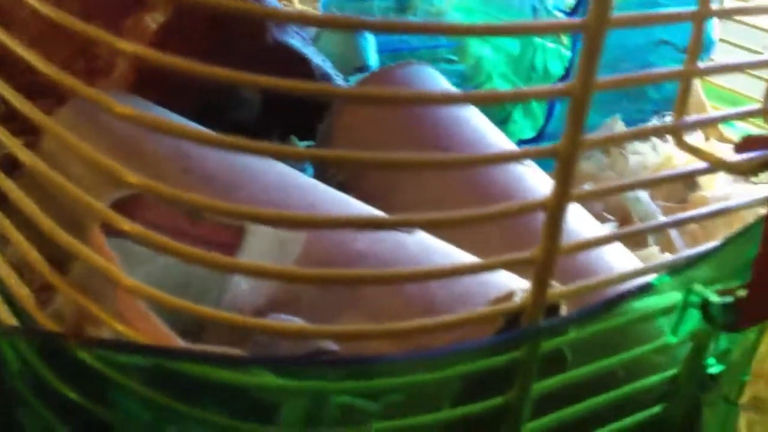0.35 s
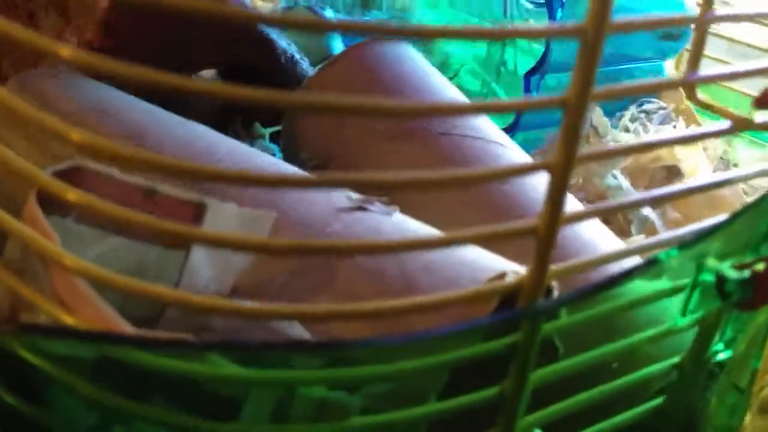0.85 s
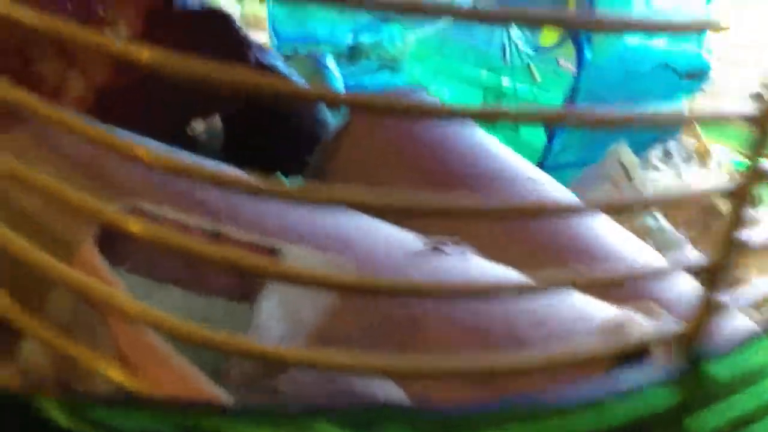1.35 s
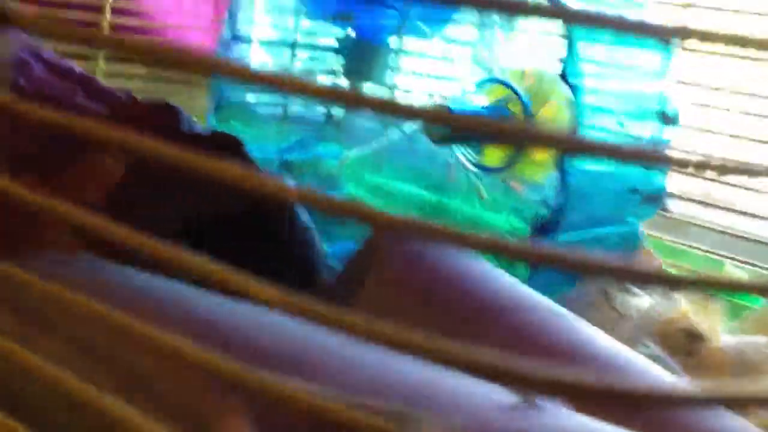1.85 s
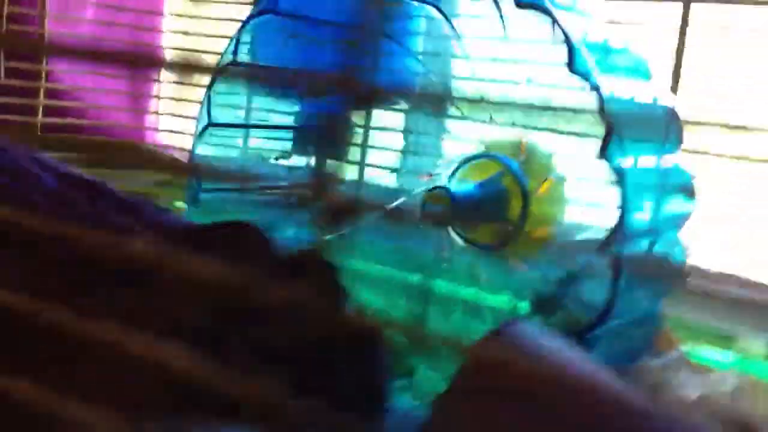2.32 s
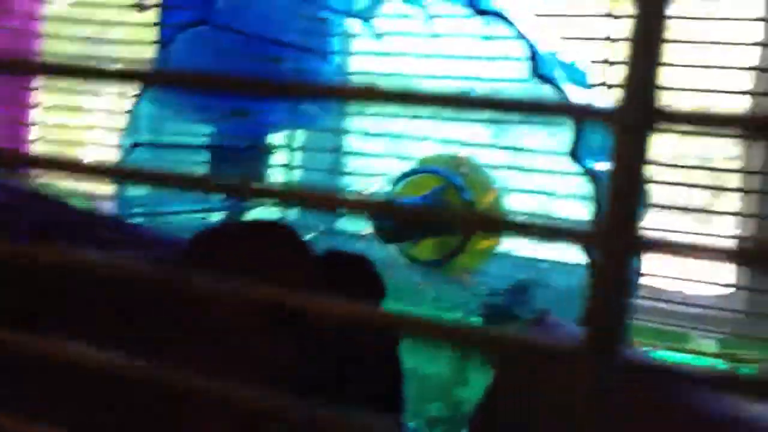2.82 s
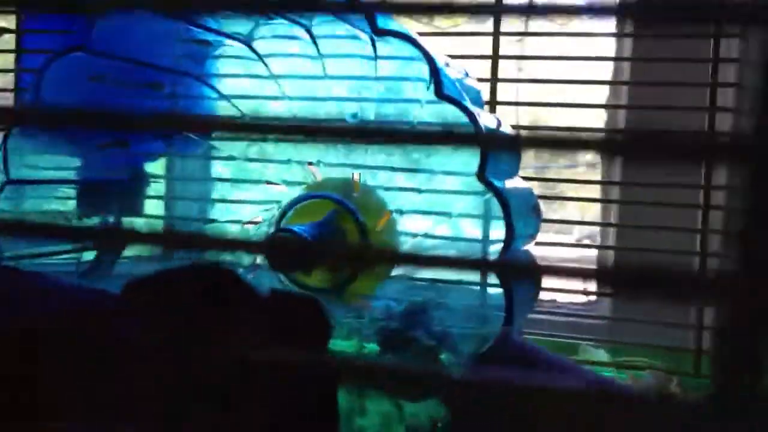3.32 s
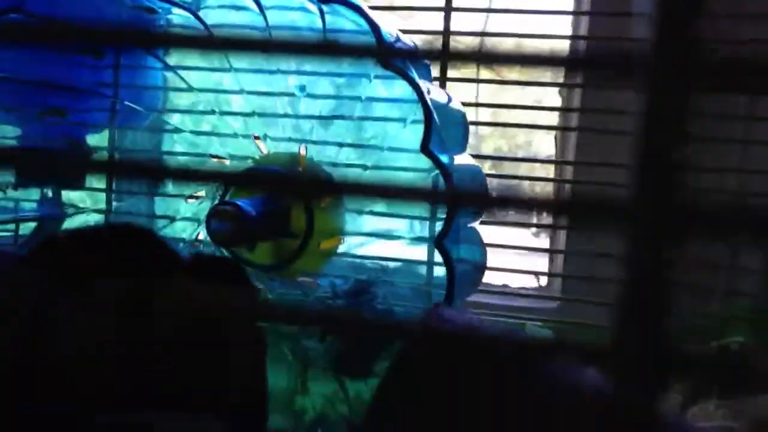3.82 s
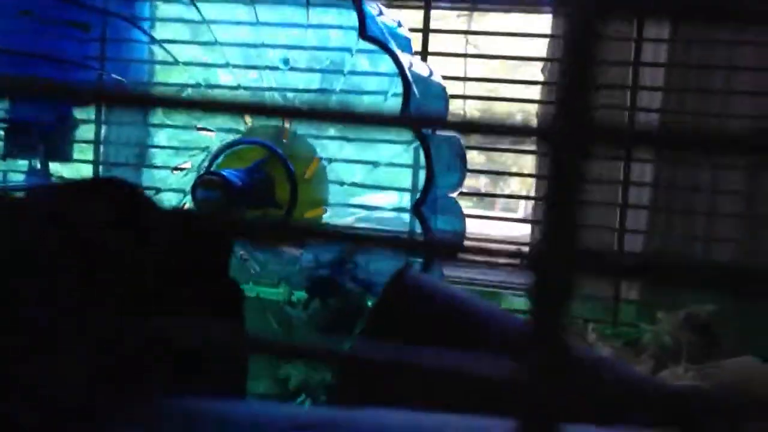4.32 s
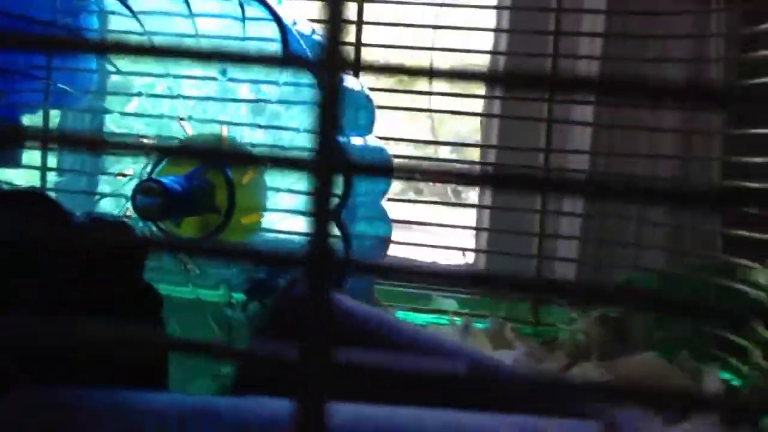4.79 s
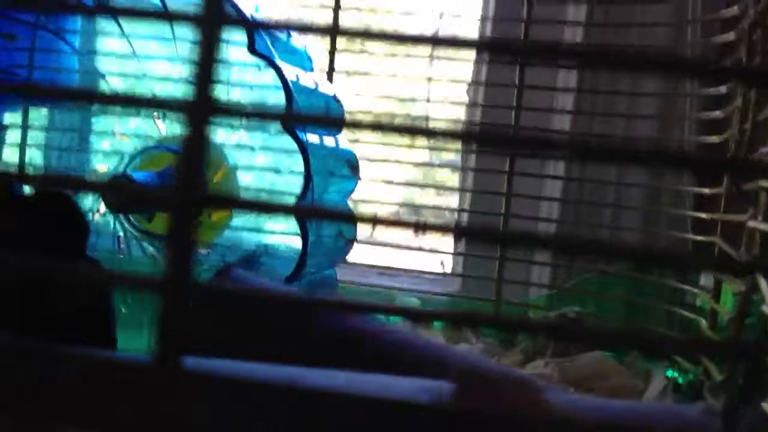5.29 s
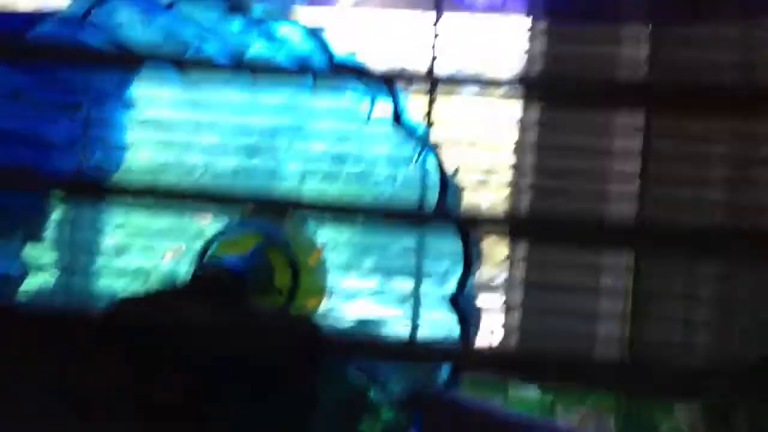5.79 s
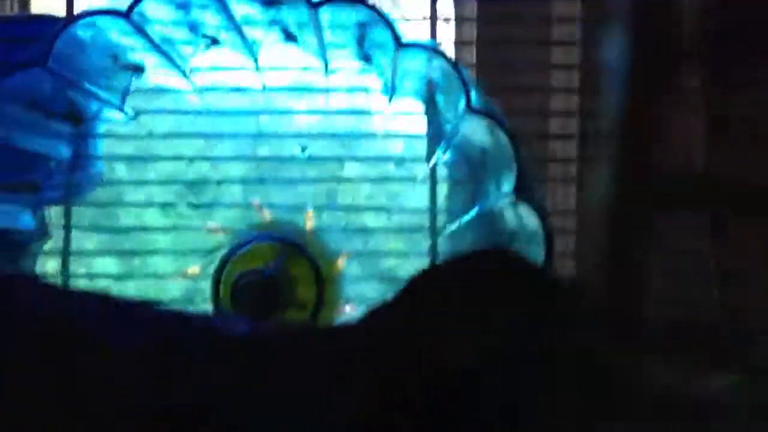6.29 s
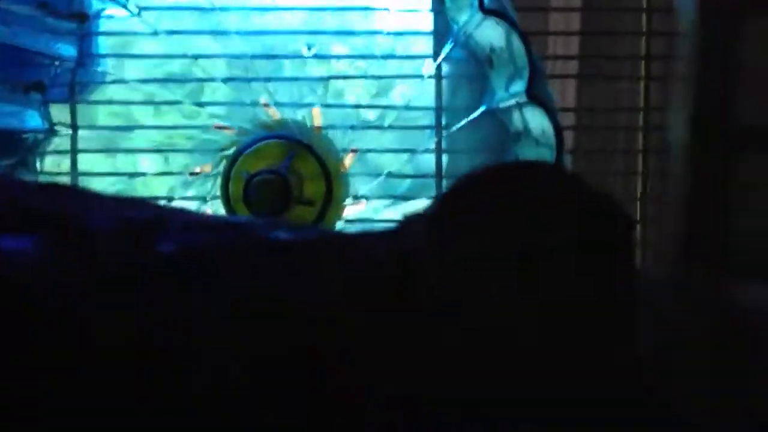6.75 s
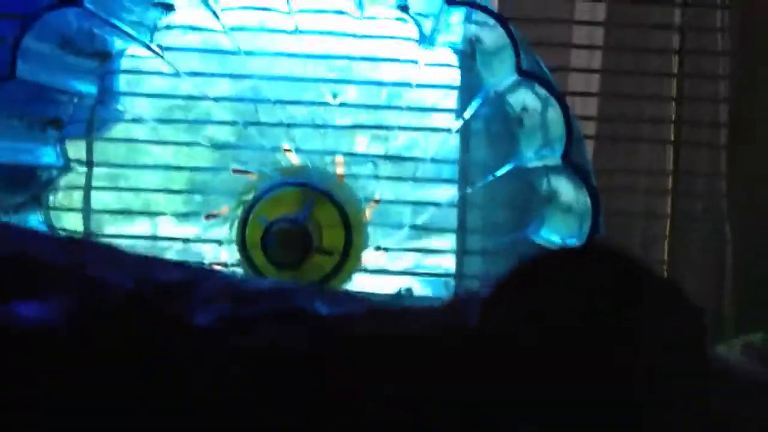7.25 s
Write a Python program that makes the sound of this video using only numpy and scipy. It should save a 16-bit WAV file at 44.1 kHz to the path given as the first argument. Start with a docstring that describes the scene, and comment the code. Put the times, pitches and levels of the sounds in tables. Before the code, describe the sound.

In a quiet room with faint hiss, a small wire and plastic cage is heard very close. Sparse dry ticks and soft brushing strokes thicken into busy crackling and plastic taps. Two sharp knocks follow, about a second apart, each with a short panel tone, dense rattle and beating metallic ring. Then it calms to a few faint ticks. A very faint distant whistle rises near the start and end.

```python
"""A quiet room, with a small animal cage of wire bars on a plastic base close by.
Bedding and fingers rustle and tick: shaped noise in tiny puffs and short crunches. Something soft brushes
past four times, as swelling hiss. Two knocks set off short panel tones and a dense noise rattle, and the
bars ring on as close, beating tones. Far away a faint whistle, a sliding tone, rises twice."""
import sys
import numpy as np
from scipy import signal
from scipy.io import wavfile
from scipy.ndimage import uniform_filter1d

SR = 44100
rng = np.random.default_rng(int(sys.argv[2]) if len(sys.argv) > 2 else 0)


def dump(signal):
    """Clip the signal to [-1, 1] and save it as 16-bit WAV at the path in sys.argv[1]."""
    limited = np.clip(np.atleast_2d(signal).T, -1, 1)
    pcm = np.round(limited * 32767).astype(np.int16)
    wavfile.write(sys.argv[1], SR, pcm)


def level_to_linear(level):
    """Convert decibel levels to linear amplitude factors, elementwise."""
    exponent = np.asarray(level, float) / 20
    return 10 ** exponent


N = 325325  # length of the scene in samples

# colour of dry crackle, ticks and fine hiss: (f/Hz, relative level per Hz/dB)
CRACKLE_COLOUR = [(350, -26.5), (600, -6), (954, -2.5), (1560, -10.5), (2220, -5.5), (3170, -8), (3780, -2),
                  (4510, -8), (5540, -2), (6400, -3.5), (8400, 1), (9700, -10), (11500, -7.5), (13000, -4),
                  (15200, -3), (15600, -26.5), (16000, -39)]
# colour of the plastic base when pushed: (f/Hz, relative level per Hz/dB)
SCUFF_COLOUR = [(29, -32.5), (50, -35), (190, 1), (366, -1.5), (602, -5.5), (800, -5.5), (923, -6.5),
                (1550, -15.5), (2200, -21.5), (3500, -27.5), (4550, -54.5), (7700, -120)]


def evened(x):
    """Scales a sound to an rms of 1."""
    return x / np.sqrt(np.mean(x ** 2) + 1e-20)


def read(points, hz):
    """Value of a table at hz, with straight lines between points on a log frequency axis."""
    f, value = np.transpose(points)
    return np.interp(np.log(hz + 1), np.log(f + 1), value)


def add(mix, s, sound):
    """Adds a sound to the mix, starting at s seconds."""
    part = mix[round(s * SR):][:len(sound)]
    part += sound[:len(part)]


def colour(x, points):
    """Minimum-phase filter with the given spectrum and energy 1: it acts as early as it can."""
    hz = abs(np.fft.fftfreq(8192, 1 / SR))
    log_gain = np.log(level_to_linear(np.maximum(read(points, hz), -100)))
    taps = np.fft.ifft(np.exp(np.conj(signal.hilbert(log_gain)))).real[:4096]
    return signal.oaconvolve(x, taps / np.linalg.norm(taps))[:len(x)]


def band(x, lo_hz, hi_hz):
    """Band-pass: keeps the part of a sound between two frequencies."""
    return signal.sosfilt(signal.butter(2, [lo_hz, hi_hz], "band", fs=SR, output="sos"), x)


def wander(smooth_s):
    """Slow random drift with an rms of 1: noise averaged twice over smooth_s."""
    size = round(smooth_s * SR)
    return evened(uniform_filter1d(uniform_filter1d(rng.standard_normal(N), size), size))


def knock(which):
    """Every blow rings the panel, shakes loose parts into a dense rattle and cracks in the treble."""
    # blows and rebounds, one list a knock: (t/s, body level/dB, treble level/dB)
    blows = [(4.184, -13, -30.5), (4.187, -6, -8.5), (4.194, -19, -12), (4.201, -22.5, -19.5),
             (4.220, -41.5, -25)], [(5.227, -16, -22.5), (5.233, -8.5, -13), (5.239, -18, -10),
             (5.258, -23, -30.5), (5.267, -31.5, -24), (5.288, -40, -26.5), (5.311, -32.5, -28),
             (5.345, -30, -49.5)]
    # panel tones, one list a knock: (f/Hz, width/Hz, relative level/dB); wide ones die sooner
    panels = [(277.2, 32, -10), (368, 25, 0), (622, 9.5, -2.5), (756, 120, -6), (1045, 15, -13.5),
              (1213, 10, -4.5), (1410, 130, -14.5), (1720, 95, -18), (1970, 31, -18.5), (2200, 200, -11),
              (2640, 69, -20), (2800, 24, -16.5)], [(186, 13, -14.5), (394, 48, 1.5), (853, 45, 0.5),
              (1230, 100, -13), (1365, 29, 3.5), (1660, 18, -13), (1965, 51, -1), (2020, 160, -5),
              (2525, 15, 2), (2975, 49, 0.5), (3134, 77, -5)]
    # colour of rattle and crack, one list a knock: (f/Hz, relative level per Hz/dB)
    clatter = [(47, -58), (80, -28.5), (136, -12.5), (309, -11), (386, 1.5), (527, -11), (802, -4.5),
               (1860, -19.5), (2380, -15), (5280, -23.5), (8410, -18.5), (10000, -28.5), (12500, -18.5),
               (15000, -27.5), (16000, -45)], [(47, -48), (80, -20.5), (174, -0.5), (253, -12.5), (395, 0),
               (431, -5), (734, -1.5), (1340, -9), (1460, 2), (1630, -5), (4520, -18), (8410, -17.5),
               (9400, -27), (14600, -23), (16000, -44.5)]
    # time the rattle takes to fall by 60 dB: (f/Hz, time/s)
    fade = [(100, .22), (500, 0.21), (1500, 0.23), (4000, .26), (8000, 0.21), (15000, 0.17)]
    # how hard each knock sets each family of bars ringing, one list a knock: (level/dB)
    bars_db = [-34.5, -51, -46, -44.5, -32.5, -54, -49.5, -52, -51, -48, -61.5, -57.5, -47, -47, -48], [-52,
               -54.5, -53, -54, -53, -60.5, -56.5, -52.5, -57.5, -47.5, -62.5, -57.5, -61, -64.5, -58.5]
    # share of the bars' ringing time left after each knock
    held = [.65, 1]
    out, t = np.zeros(N), np.arange(SR // 2) / SR
    modes = np.zeros(len(t))
    for hz, width, db in panels[which]:
        modes += level_to_linear(db) * width * np.exp(-.8 * np.pi * width * t) * np.sin(2 * np.pi * hz * t)
    modes *= (1 - np.exp(-t / 0.00033)) / abs(modes).max()
    for s, body_db, treble_db in blows[which]:
        # noise in which every frequency dies at its own rate
        hz, frame_s, z = signal.stft(rng.standard_normal(len(t)), SR, nperseg=128)
        z = z * level_to_linear(-60 * frame_s / read(fade, hz)[:, None])
        fading = signal.istft(z, SR, nperseg=128)[1][:len(t)]
        rattle = colour(fading * (1 - np.exp(-t / 0.0012)), clatter[which])
        burst = rng.standard_normal(len(t)) * level_to_linear(-60 * t / .04) * (1 - np.exp(-t / 0.00021))
        crack = colour(burst, clatter[which])
        body = level_to_linear(2.0) * modes + level_to_linear(-10.0) * band(rattle, 130., 4000.)
        treble = level_to_linear(4.0) * band(crack, 3700.0, 22000.0) + level_to_linear(-9.5) * band(rattle, 4000., 15500.)
        add(out, s, level_to_linear(body_db) * body + level_to_linear(treble_db) * treble)
    first_blow_s = blows[which][0][0]
    add(out, first_blow_s, bars(bars_db[which], held[which]))
    return out


def bars(levels_db, held, count=3):
    """Each family is a few nearly alike wires: close tones that beat as they die."""
    # families of wire bars: (f/Hz, time to fall by 60 dB when the share held is 1/s)
    families = [(435, 1.1), (505, 3.0), (565, 2.6), (605, 4.0), (850, .6), (1390, 2.2), (1480, 1.2),
                (1565, 2.2), (1620, 1.8), (1770, 1.0), (2750, .9), (3400, .8), (4300, .8), (4850, .8),
                (5750, .7)]
    t = np.arange(3 * SR) / SR
    sound = np.zeros(len(t))
    for (hz, t60), db in zip(families, levels_db):
        detune = 1 + .013 * (np.linspace(-1, 1, count) + .3 * rng.standard_normal(count))
        phase = 2 * np.pi * rng.random((count, 1))
        wires = np.sin(2 * np.pi * hz * np.outer(detune, t) + phase).sum(0)
        sound += level_to_linear(db - 60 * t / (held * t60)) * wires
    return sound / np.sqrt(count) * (1 - np.exp(-t / 0.019))


def ticks():
    """A short crunch that stops abruptly and leaves a weak tail; the struck bit rings, the base thuds on."""
    # bright snaps of dry bedding and wire: (t/s, treble level/dB, middle level/dB, f of struck bit/Hz,
    # length/ms)
    snaps = [(0.2463, -58.5, -63.5, 7800, 4.2), (0.6013, -61.5, -81, 8450, 2.7),
             (0.646, -62, -69, 7860, 20), (1.247, -62.5, -70, 7900, 4.4), (1.3483, -53.5, -63, 13200, 5.5),
             (2.0443, -56, -61.5, 12500, 24), (2.13, -62, -74, 14500, 14), (2.5889, -62, -76, 12000, 4.3),
             (2.645, -60, -65, 7900, 17), (2.6922, -54.5, -60.5, 13100, 13),
             (2.735, -50.5, -71, 12500, 5.7), (2.749, -59, -65, 14400, 5.5), (2.762, -57, -72, 14500, 6.8),
             (2.82, -53.5, -65, 13500, 1.9), (2.8927, -62, -75, 14780, 2.9),
             (2.9108, -59.5, -75, 14620, 2.6), (3.2588, -53.5, -60, 14790, 7.0),
             (3.2794, -56, -56, 5470, 6), (3.299, -41.5, -49.5, 12900, 7.3),
             (3.3083, -43.5, -58, 7690, 9.6), (3.3359, -44.5, -46.5, 6970, 4.7),
             (3.344, -42, -60, 8400, 2.7), (3.36, -56, -59, 5500, 32), (3.391, -41, -50.5, 7660, 9.7),
             (3.398, -42, -65, 8200, 7.2), (3.4267, -47, -64, 8320, 5.6), (3.4466, -36, -45.5, 13400, 10),
             (3.4795, -41.5, -47, 5330, 5.2), (3.5092, -35, -78, 13300, 6.4),
             (3.5142, -46.5, -45, 12940, 2.2), (3.524, -44.5, -68, 12970, 8.5),
             (3.539, -41, -44, 5600, 7.6), (3.7007, -53, -57.5, 13200, 7.9),
             (3.7457, -55, -61.5, 7750, 30.0), (3.817, -50.5, -57, 8260, 2.3), (3.9176, -55, -63, 5530, 26),
             (3.9823, -52, -61, 5400, 24), (4.0467, -52, -69.5, 7950, 8.9), (4.165, -50.5, -77, 7870, 5),
             (4.379, -60, -71, 7900, 4), (4.394, -61, -66, 7860, 4.2), (4.5098, -51, -59, 7800, 3.4),
             (4.6, -56.5, -74, 5700, 8.7), (4.62, -50, -53, 5800, 2.3), (4.66, -56, -64, 5650, 21),
             (4.741, -59, -68, 12800, 2.5), (4.8035, -51, -51, 8900, 11), (5.0062, -56, -66.5, 7700, 5),
             (5.128, -59, -67, 7800, 11), (6.0676, -51.5, -48, 3580, 15.5),
             (6.5156, -61.5, -60.5, 4500, 9.7), (7.0254, -64, -63.5, 4490, 11.5)]
    # taps on the plastic base: (t/s, treble level/dB, middle level/dB, thud level/dB, length/ms)
    taps = [(0.4892, -52, -56.5, -60.5, 2), (1.0137, -66, -68, -72, 41), (1.9878, -59.5, -55.5, -67, 0.8),
            (2.0695, -45.5, -42.5, -60, 1.66), (2.4053, -58.5, -53.5, -50.5, 2.1),
            (2.7719, -57, -51, -75, 2.1), (3.0151, -53, -52, -66, 1.6), (3.1658, -54, -57, -68, 2.7),
            (3.554, -56.5, -47.5, -62, 5.7), (3.561, -55, -67, -48.5, 8), (3.5905, -43, -45.5, -48, 9.2),
            (3.6075, -44.5, -45, -46, 2.7), (3.8846, -41.5, -45, -44.5, 4.3),
            (4.3522, -58.5, -41, -64, 2.1), (4.479, -58, -61.5, -71, 8.6), (4.557, -63.5, -57.5, -47, 28),
            (4.5986, -57, -48.5, -49.5, 11), (4.6605, -57.5, -49.5, -46.5, 10),
            (4.7161, -61, -63, -69, 7.6), (4.8226, -51, -42.5, -43.5, 15.5),
            (5.0306, -61.5, -72, -55, 11.5), (5.739, -69.5, -67.5, -78, 9.1), (5.768, -69, -65.5, -76, 15),
            (5.8085, -61.5, -64.5, -62.5, 12.4)]
    snap_thud_db = -22.5  # thud of the base under a snap, against its treble
    snap_thud_s, tap_thud_s = 0.007, 0.0096  # fading times of the thuds
    reach, edge_hz = 2.3, 16000.  # a snap's treble ends at this multiple of its pitch, at most at edge_hz
    tap_hz, tap_top_hz = 2230, 12000.  # pitch of the tapped plastic, end of its treble
    width = .25  # width of the ringing, as a share of its pitch
    ring_db, ring_db_per_octave = -7.5, 10.0  # ringing level, and its rise above 8000 Hz
    tail_db, tail_s = -7.5, 0.0066  # weak tail of the crunch
    linger_db, linger_s = -8.5, 0.014  # plastic ringing on in the middle
    t, out = np.arange(round(.2 * SR)) / SR, np.zeros(N)
    rows = []
    for s, high_db, mid_db, hz, ms in snaps:
        top_hz = min(reach * hz, edge_hz)
        rows.append((s, high_db, mid_db, high_db + snap_thud_db, hz, ms, top_hz, snap_thud_s))
    for s, high_db, mid_db, thud_db, ms in taps:
        rows.append((s, high_db, mid_db, thud_db, tap_hz, ms, tap_top_hz, tap_thud_s))
    for s, high_db, mid_db, thud_db, hz, ms, top_hz, thud_s in rows:
        crunch_noise, thud_noise, linger_noise = rng.standard_normal((3, len(t)))
        u = t / (ms / 1000)  # time as a share of the tick's length
        crunch = (1 - np.exp(-u / .15)) * np.exp(-u ** 2)
        tail = level_to_linear(tail_db) * (1 - np.exp(-u)) * np.exp(-t / tail_s)
        puff = crunch_noise * (crunch + tail)
        ringing = signal.lfilter(*signal.iirpeak(hz, 1 / width, SR), puff)
        ringing *= np.linalg.norm(puff) / np.linalg.norm(ringing)
        ring_gain = level_to_linear(ring_db + ring_db_per_octave * max(np.log2(hz / 8000), 0))
        snap = colour(puff, CRACKLE_COLOUR) + ring_gain * ringing
        high, middle = band(snap, 4500., top_hz), band(snap, 1000., 4500.)
        burst = u < 1  # the levels hold for this part
        high, middle = high / high[burst].std(), middle / middle[burst].std()
        linger = band(linger_noise, 630.0, 4000.) * (1 - np.exp(-u)) * np.exp(-t / linger_s)
        middle += level_to_linear(linger_db) * linger
        thud_shape = (1 - np.exp(-t / .002)) * np.exp(-np.maximum(t - ms / 1000, 0) / thud_s)
        thud = colour(thud_noise * thud_shape, SCUFF_COLOUR)
        add(out, s, level_to_linear(high_db) * high + level_to_linear(mid_db) * middle + level_to_linear(thud_db) * thud)
    return out


def tray(x, ring_db=-14.5, echo_db=-13.0, echo_t60_s=0.17):
    """The base answers every tick with its own short tones and a brief diffuse echo."""
    # tones of the plastic base: (f/Hz, relative level/dB, time to fall by 60 dB/s)
    tones = [(200, -3, 0.047), (347, -35.5, 0.25), (446, -10, 0.21), (756, -1, 0.2), (932, -1.5, 0.22),
             (1270, -5, 0.11), (1440, -2, 0.29), (1950, -1.5, 0.1), (2430, -10.5, 0.057),
             (2670, -11.5, .06), (3600, -6.5, 0.13), (4200, -8, 0.06), (6040, -4.5, 0.093)]
    t = np.arange(round(.3 * SR)) / SR
    modes = sum(level_to_linear(db - 60 * t / t60) * np.sin(2 * np.pi * hz * t) for hz, db, t60 in tones)
    echo = band(rng.standard_normal(len(t)), 160.0, 6500.0)
    echo *= level_to_linear(-60 * t / echo_t60_s) * (1 - np.exp(-t / 0.0021))
    answer = level_to_linear(ring_db) * modes / np.linalg.norm(modes) + level_to_linear(echo_db) * echo / np.linalg.norm(echo)
    return x + signal.oaconvolve(x, answer)[:N]


def brushes(width_hz=1600.0):
    """Smooth hiss around one resonance, a dull skirt below it and fine hiss above; each stroke swells and stops."""
    # soft strokes: (start t/s, length/s, loudest point as share of length, hiss level at its top/dB,
    # centre f/Hz)
    strokes = [(1.595, 0.092, 0.69, -62, 3486), (1.731, .14, 0.35, -61.5, 3240),
               (2.166, .095, 0.57, -52.5, 3800), (2.274, 0.11, 0.44, -58, 3740)]
    swell_power = 0.96  # sharpness of the swell
    fine_db, fine_per_db = -6.5, 0.9  # fine hiss in a stroke of -60 dB, and its gain as strokes harden
    out = np.zeros(N)
    lowpass = signal.butter(3, width_hz / 2, fs=SR, output="sos")
    for start, length, top, db, hz in strokes:
        t = np.arange(0, length, 1 / SR)
        turn = 2 * np.pi * hz * t
        # slow noise times a tone becomes hiss around that tone
        a, b, c = signal.sosfilt(lowpass, rng.standard_normal((3, len(t))))
        skirt = level_to_linear(-5.0) * c * np.cos(0.32 * turn)
        hiss = evened(a * np.cos(turn) + b * np.sin(turn) + skirt)
        fine = evened(band(colour(rng.standard_normal(len(t)), CRACKLE_COLOUR), 3900.0, 18000.))
        fine *= level_to_linear(fine_db + fine_per_db * (db + 60))
        bent = (t / length) ** (np.log(.5) / np.log(top))  # reaches one half at the loudest point
        swell = np.sin(np.pi * bent) ** swell_power
        add(out, start, level_to_linear(db) * swell * (hiss + fine))
    return out


def rustle(grains_per_s=400, spread_db=3., flutter_db=1.5):
    """Clumps of tiny snaps, each a short puff of noise, over a dull scuffing."""
    # course of the rustling: (t/s, dry crackle level/dB, dull scuffing level/dB, finest hiss level/dB)
    course = [(0.0, -69.5, -68, -73.5), (0.88, -72, -69.5, -75), (1.3, -67.5, -70.5, -68),
              (1.89, -73.5, -72, -79.5), (2.05, -59, -69.5, -58.5), (2.24, -68, -66, -72),
              (2.42, -88, -67.5, -92), (2.67, -59.5, -70, -64), (2.84, -75, -67.5, -71),
              (3.06, -56.5, -66, -58.5), (3.61, -60.5, -59.5, -60), (3.72, -60, -60, -62.5),
              (3.98, -56, -64.5, -59.5), (4.15, -62, -65.5, -64.5), (4.46, -64, -71, -72),
              (4.58, -60, -52, -67), (4.7, -58, -57.5, -60), (4.85, -72.5, -67.5, -70.5),
              (5.3, -67, -62.5, -73.5), (5.5, -83.5, -67.5, -83), (6.8, -78.5, -70.5, -78.5),
              (7.01, -67.5, -67.5, -75), (7.38, -95, -70, -84)]
    s, crackle_db, scuff_db, fine_db = np.transpose(course)
    t = np.arange(N) / SR
    grains = rng.random(N) < grains_per_s / SR
    snaps = grains * level_to_linear(spread_db * np.minimum(rng.exponential(1, N), 4))
    puff_power = signal.lfilter([1], [1, -np.exp(-1 / (0.0014 * SR))], snaps ** 2)  # dies over 1.4 ms
    puffs = np.sqrt(abs(puff_power) + .3)  # the .3 keeps some hiss between puffs
    flutter = level_to_linear(flutter_db * wander(.015))
    dry_noise = evened(colour(puffs * flutter * rng.standard_normal(N), CRACKLE_COLOUR))
    coarse = evened(band(dry_noise, 500., 12000.))
    fine = evened(band(dry_noise, 10000., 19000.))
    dull = evened(colour(level_to_linear(2 * wander(.03)) * rng.standard_normal(N), SCUFF_COLOUR))
    out = level_to_linear(np.interp(t, s, crackle_db)) * coarse
    out += level_to_linear(np.interp(t, s, fine_db)) * fine
    out += level_to_linear(np.interp(t, s, scuff_db)) * dull
    return out


def whistles():
    """A thin, unsteady tone that slides up once in each call."""
    # far whistle: (start t/s, length/s, level before wavering/dB, about first f/Hz, about last f/Hz)
    calls = [(0.40, .48, -75.5, 745, 862), (6.2, .42, -79.5, 736, 885)]
    # share of each call at which the pitch is halfway up
    glide_middle = [.52, .3]
    glide_span = .2  # how gradual the slide is, as a share of the call
    out = np.zeros(N)
    waver = level_to_linear(5. * wander(.025))  # of the level
    wobble = 1 + .012 * wander(.03)  # of the pitch
    for (start, length, db, first_hz, last_hz), middle in zip(calls, glide_middle):
        t = np.arange(0, length, 1 / SR)
        rise = (1 + np.tanh((t / length - middle) / glide_span)) / 2
        hz = first_hz + (last_hz - first_hz) * rise
        hz = hz * wobble[round(start * SR):][:len(t)]
        tone = np.sqrt(2) * np.sin(2 * np.pi * np.cumsum(hz) / SR)
        add(out, start, level_to_linear(db) * tone * signal.windows.tukey(len(t), .3))
    return out * waver


def room():
    """Hiss of the quiet room and the microphone: steady coloured noise that breathes a little."""
    # colour of the hiss: (f/Hz, relative level per Hz/dB)
    hiss_colour = [(18, -58.5), (30, -9), (97, -3), (160, -3), (219, 1.5), (658, -28.5), (1400, -16),
                   (1520, -12.5), (1730, -11.5), (4680, -17), (7300, -13.5), (10000, -20), (14000, -15.5),
                   (15300, -17), (15550, -45.5)]
    level_db = -70.5 + 0.25 * wander(.05)
    return level_to_linear(level_db) * colour(rng.standard_normal(N), hiss_colour)


def scene():
    """All sources added up at one microphone."""
    cage = knock(which=0) + knock(which=1) + tray(ticks()) + brushes() + rustle()
    return (cage + whistles() + room())[None]  # one channel


def low_pass(x):
    """Removes everything above the highest recorded frequency."""
    return signal.sosfilt(signal.butter(12, 16440, fs=SR, output="sos"), x)


def record(dry):
    """The small microphone loses the bass, below about 85 Hz."""
    thin = signal.sosfilt(signal.butter(3, 85., "high", fs=SR, output="sos"), dry)
    return low_pass(thin)


dry = scene()
out = record(dry)
dump(out)
```